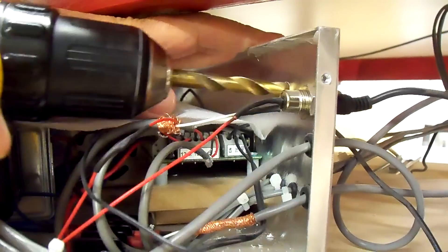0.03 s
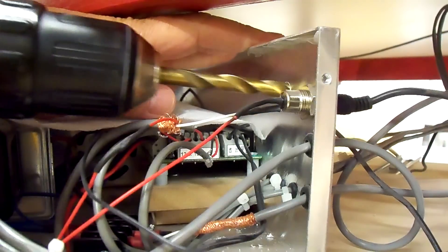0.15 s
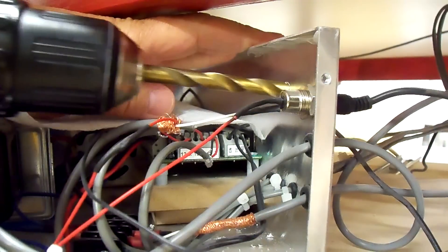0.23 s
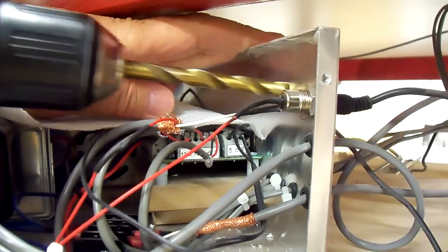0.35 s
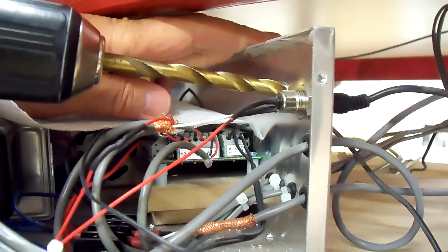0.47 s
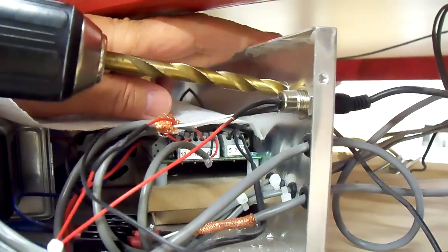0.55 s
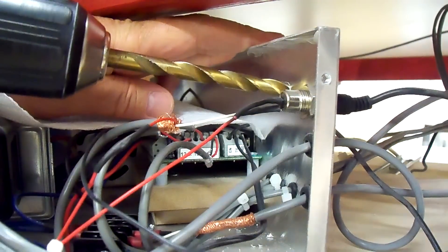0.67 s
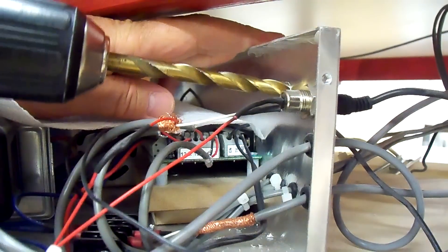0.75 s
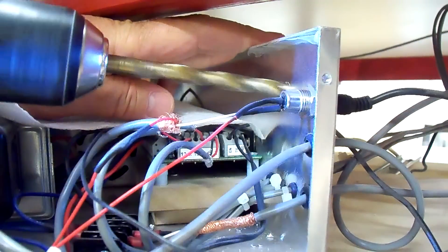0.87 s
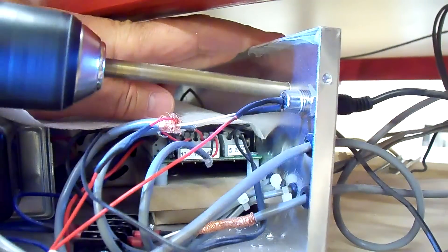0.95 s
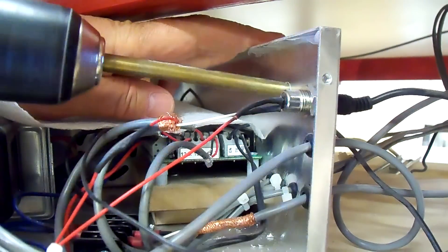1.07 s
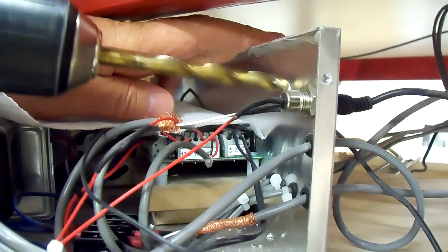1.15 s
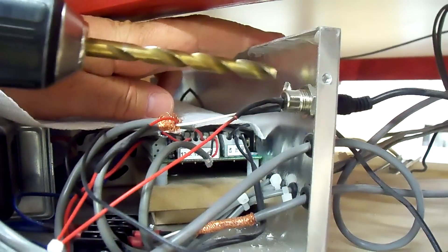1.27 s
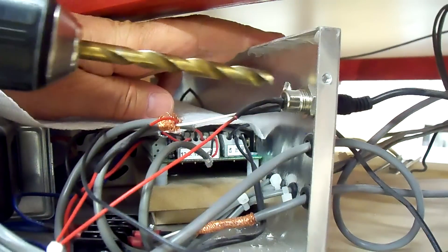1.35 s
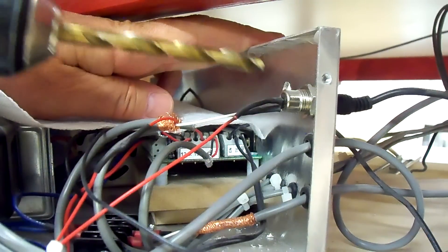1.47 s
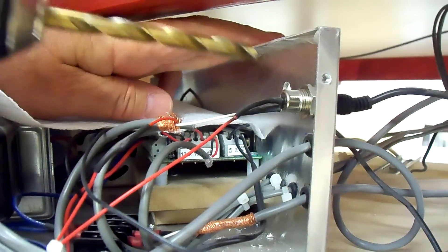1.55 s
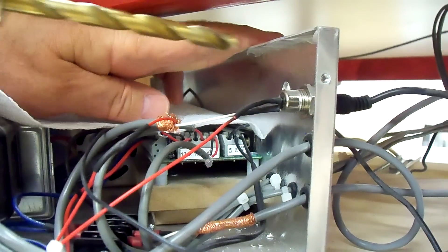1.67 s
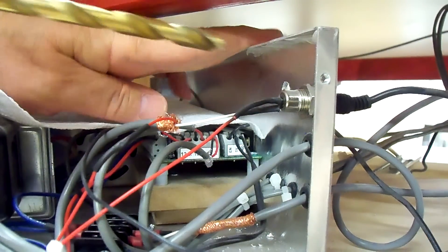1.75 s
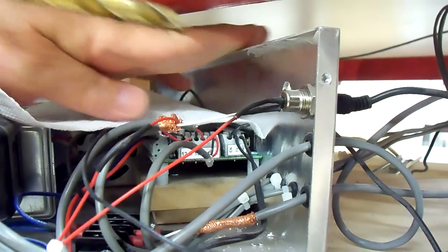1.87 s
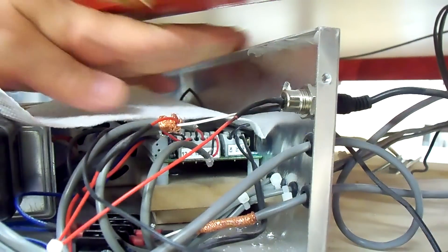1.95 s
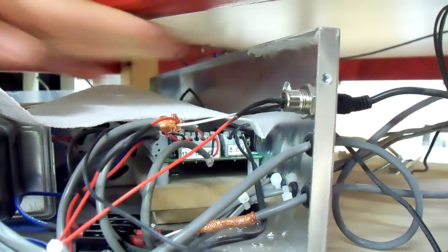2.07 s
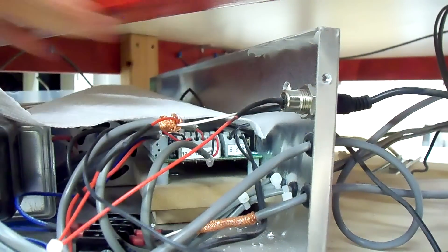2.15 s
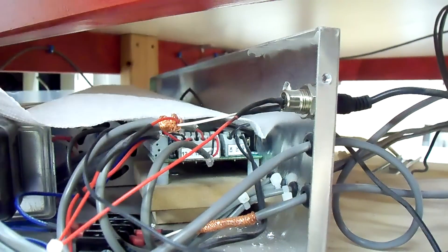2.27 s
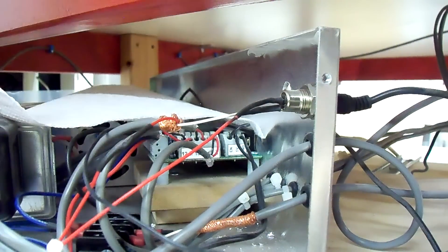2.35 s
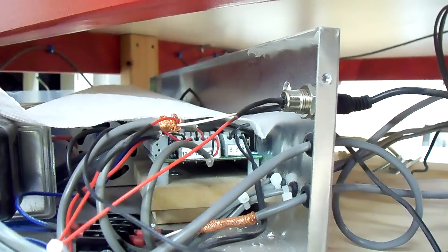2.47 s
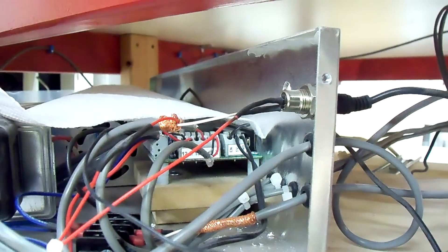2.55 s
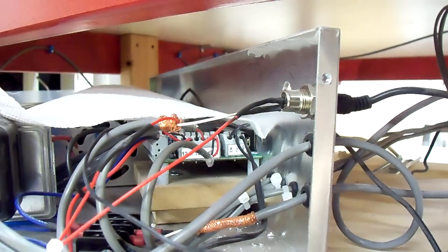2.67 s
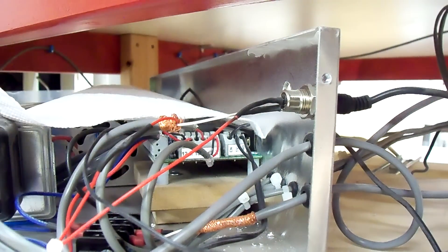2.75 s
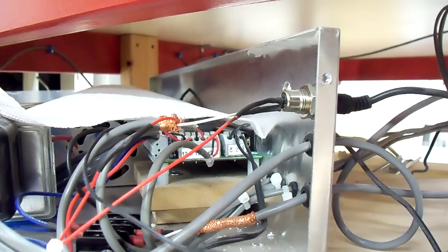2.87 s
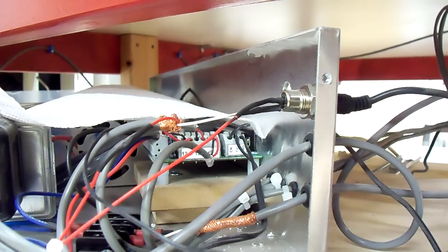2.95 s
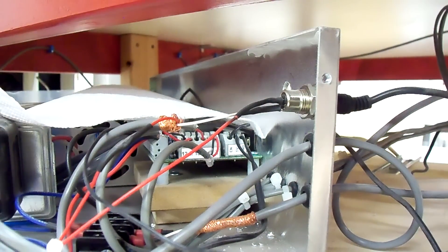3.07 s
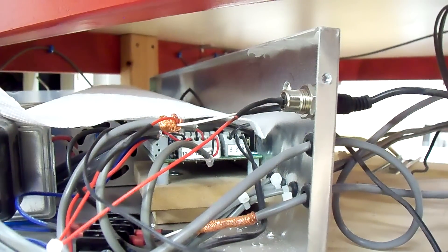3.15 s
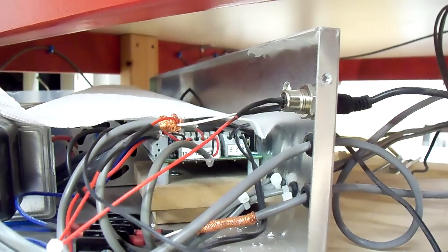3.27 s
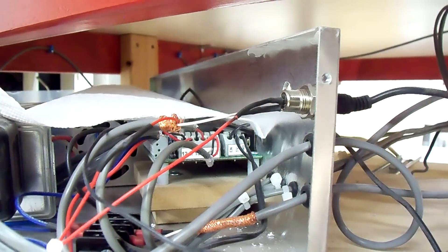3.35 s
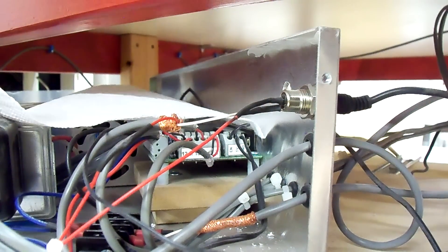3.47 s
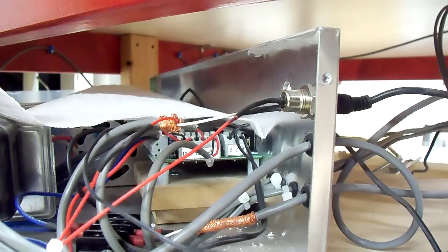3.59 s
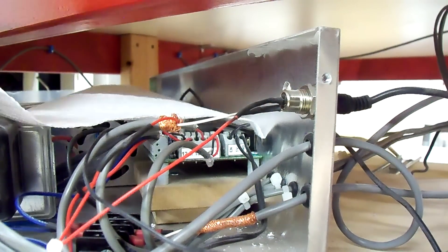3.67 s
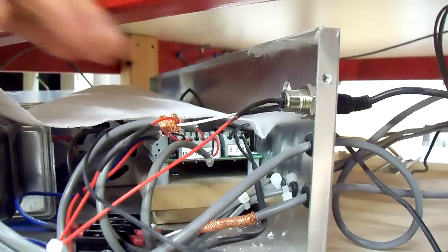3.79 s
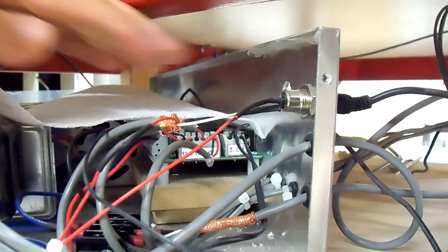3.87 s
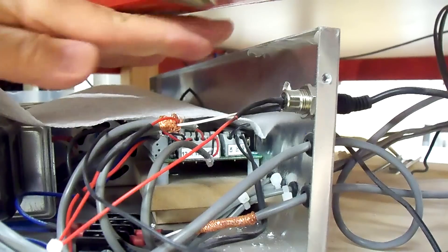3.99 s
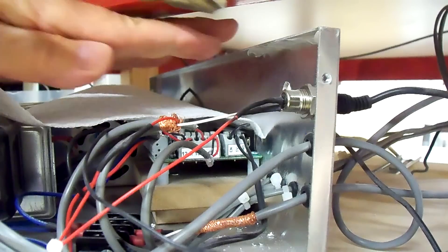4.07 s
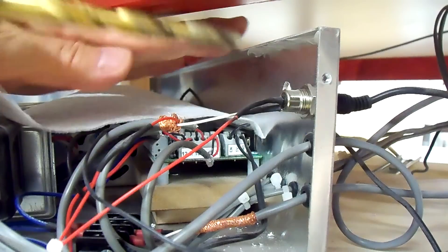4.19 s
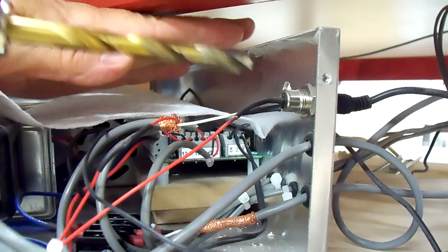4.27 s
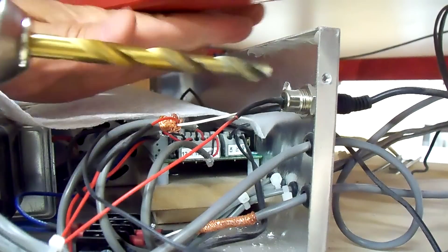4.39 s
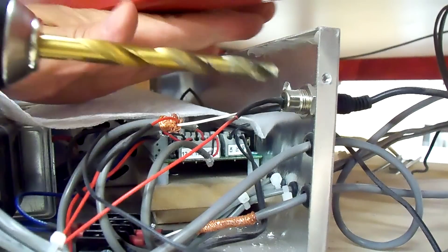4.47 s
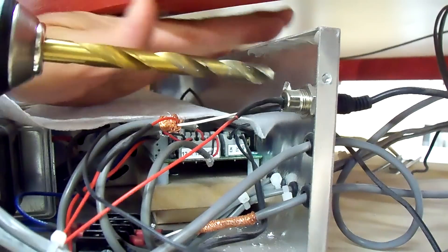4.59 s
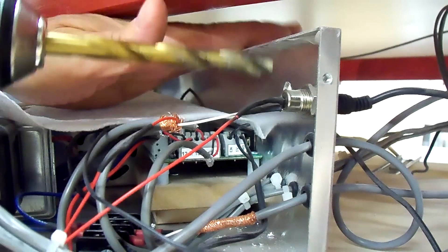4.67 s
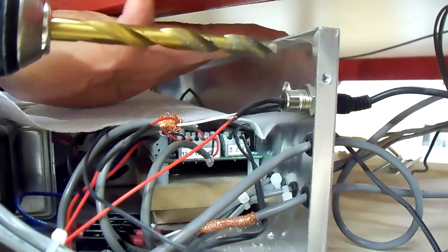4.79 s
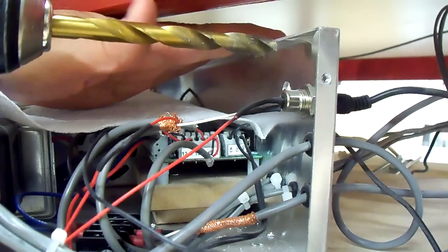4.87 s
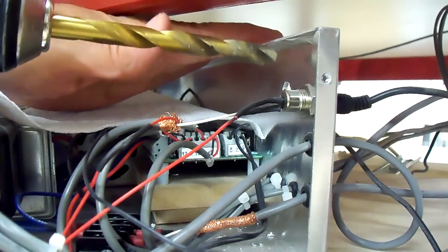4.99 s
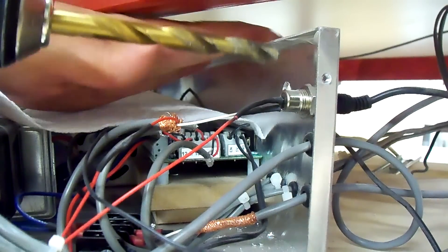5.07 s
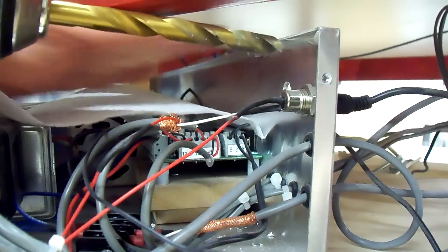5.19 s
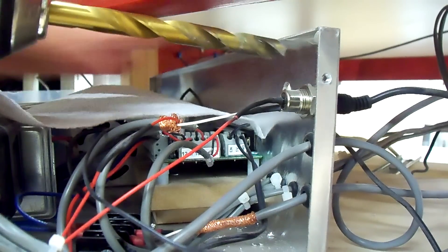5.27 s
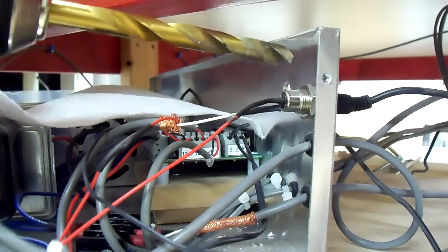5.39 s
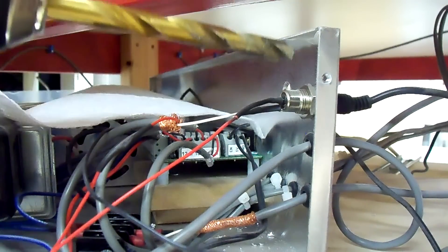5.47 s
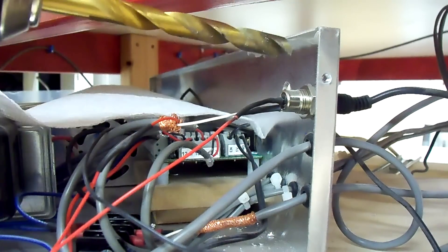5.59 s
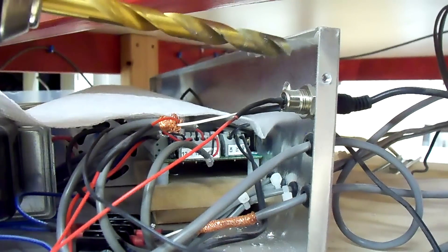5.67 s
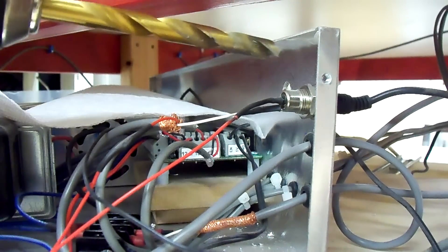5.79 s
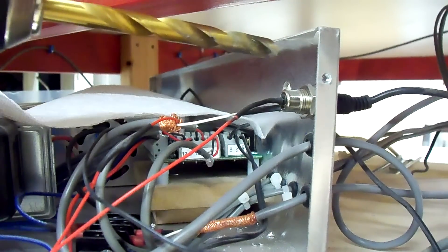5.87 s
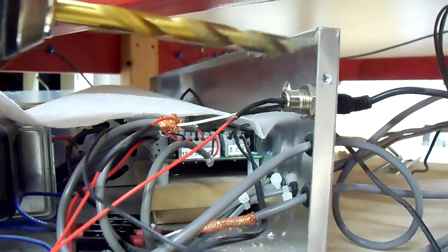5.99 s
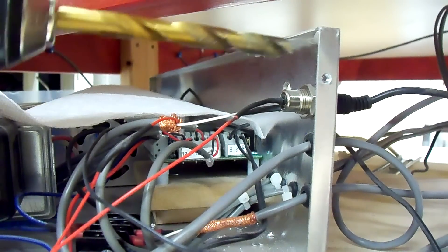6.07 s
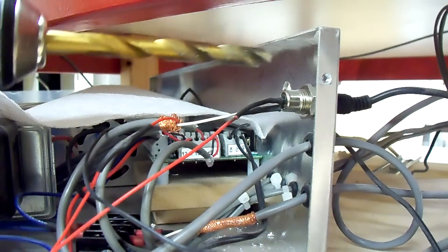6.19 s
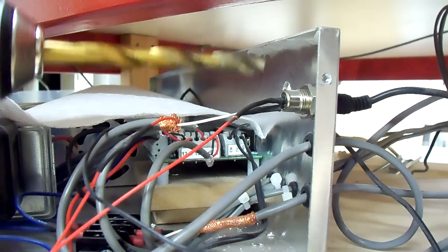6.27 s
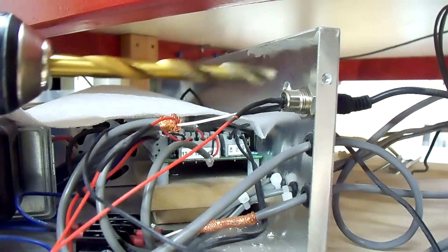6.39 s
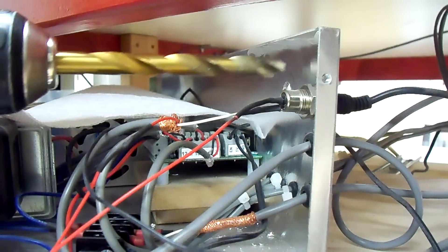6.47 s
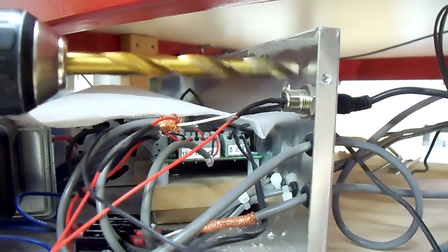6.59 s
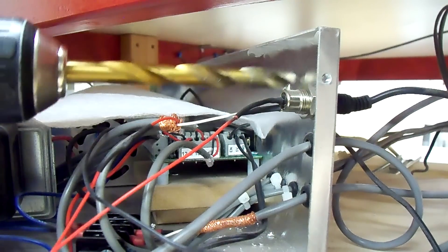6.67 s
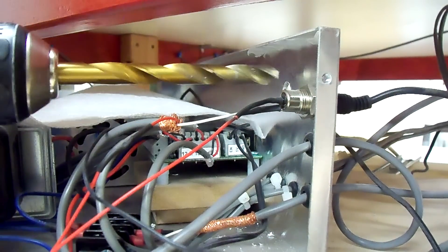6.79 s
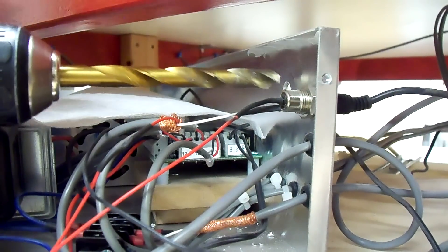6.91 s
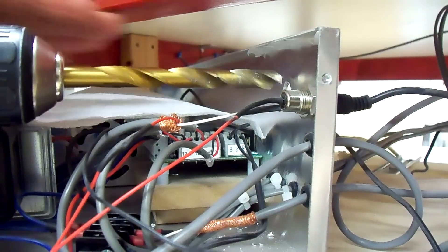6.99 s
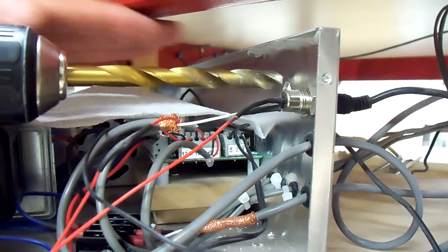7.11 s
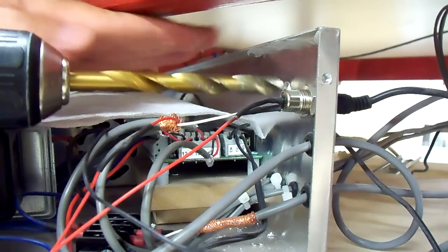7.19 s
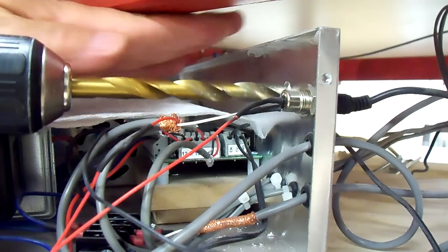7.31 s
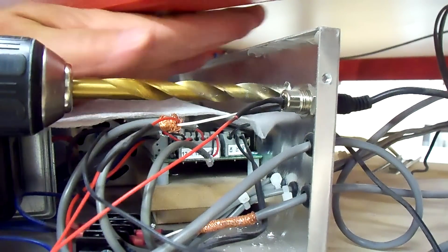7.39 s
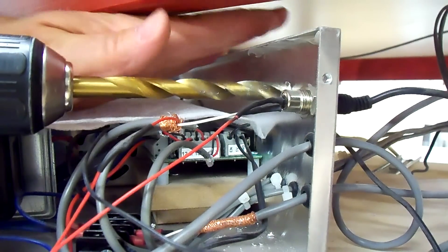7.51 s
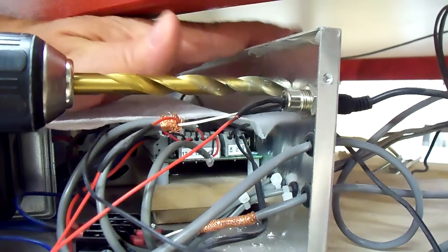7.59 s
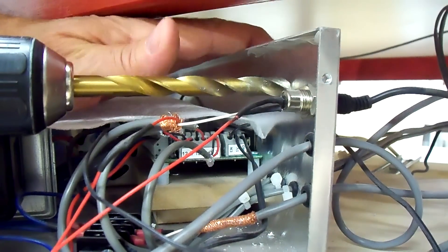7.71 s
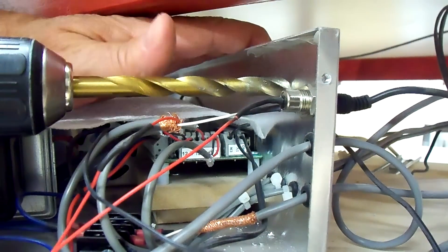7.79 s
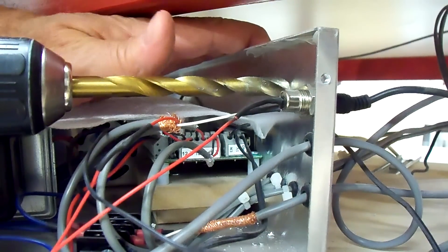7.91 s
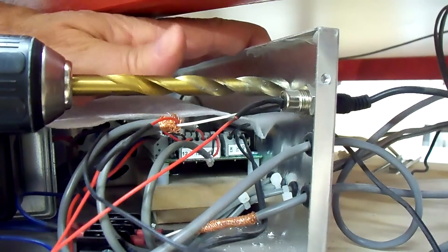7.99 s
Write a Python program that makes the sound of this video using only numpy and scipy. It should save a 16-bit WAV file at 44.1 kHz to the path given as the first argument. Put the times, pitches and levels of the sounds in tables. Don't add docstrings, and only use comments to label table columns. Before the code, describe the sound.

Very close in an open sheet-metal box, a drill chuck clacks hard and bounces, with faint squeaks. A cordless drill spins for about a quarter second, hissy and gritty, and the brake clacks it still. After a near-silent gap, hands rustle, the bit ticks and taps the panels, and a denser flurry of scrapes and ringing knocks closes it. Small room, low rumble and faint buzz behind.

```python
import sys
import numpy as np
from scipy import signal
from scipy.fft import rfft, irfft, next_fast_len
from scipy.io import wavfile
from scipy.ndimage import uniform_filter1d

SR = 44100
rng = np.random.default_rng(int(sys.argv[2]) if len(sys.argv) > 2 else 0)


def rack_gain(trim_db):
    fader = np.asarray(trim_db, float)
    return 10 ** (fader / 20)


def file_out(sig):
    cols = np.atleast_2d(sig).T
    lim = np.clip(cols, -1, 1)
    pcm = np.round(lim * 32767).astype(np.int16)
    wavfile.write(sys.argv[1], SR, pcm)


N = 354991


def evened(x):
    return x / np.sqrt(np.mean(x ** 2) + 1e-20)


def read(points, hz):
    f, value = np.transpose(points)
    return np.interp(np.log(hz + 1), np.log(f + 1), value)


def curve(rows, quiet=-120.):
    s, value = np.transpose(rows)
    return np.interp(np.arange(N) / SR, s, value, left=quiet, right=quiet)


def add(mix, s, sound):
    part = mix[max(round(s * SR), 0):][:len(sound)]
    part += sound[:len(part)]


def band(x, lo_hz, hi_hz):
    return signal.sosfilt(signal.butter(N=2, Wn=[lo_hz, hi_hz], btype="band", fs=SR, output="sos"), x)


def resonate(x, hz, width):
    turn = np.exp(2j * np.pi * np.cumsum(hz * np.ones(len(x))) / SR)
    r = np.exp(-np.pi * width / SR)
    return 2 * (turn * signal.lfilter([1 - r], [1, -r], x / turn)).real


def coloured(x, points):
    size = next_fast_len(len(x))
    gain = rack_gain(read(points, np.fft.rfftfreq(size, 1 / SR)))
    return evened(irfft(rfft(x, size) * gain, size)[:len(x)])


def drift(seconds, count=N):
    size = max(int(seconds * SR), 1)
    return evened(uniform_filter1d(uniform_filter1d(rng.standard_normal(count), size), size))


def gritty(flicker_db, seconds, spread_db, count=N):
    level_db = flicker_db * drift(seconds, count) + spread_db * drift(.0006, count)
    return rng.standard_normal(count) * rack_gain(level_db)


def room_air():
    # (time [s], level [dB])
    air_level = [(0, -54), (.3, -64), (.67, -70.5), (1.37, -73), (2.1, -70.5), (2.708, -73), (2.71, -58),
                 (3.4, -56.5), (3.81, -52.5), (4.2, -56.5), (4.78, -53.5), (5.54, -57), (6.77, -53.5),
                 (7.62, -51), (8.05, -50)]
    # (frequency [Hz], level per Hz [dB])
    rumble_colour = [(8.8, -31.5), (15, 1), (52, 4.5), (119, -10), (161, -15), (200, -17.5), (260, -49.5),
                     (440, -120)]
    # (frequency [Hz], level per Hz [dB])
    air_colour = [(59, -25.5), (100, -0.5), (262, -6), (359, -7), (502, -13.5), (703, -14), (1630, -20),
                  (2800, -21.5), (13500, -28.5), (15000, -53)]
    air_db = curve(air_level)
    rumble = coloured(gritty(1.5, .1, 0), rumble_colour)
    rumble_db = -55.5 + .35 * (air_db + 56)
    air = coloured(gritty(0.69, 0.022, 0), air_colour)
    air = air / np.std(band(air, 100, 600))
    air = air + rack_gain(-9.5 + 4.8 * drift(.12)) * band(air, 310, 800)
    hum_hz = 118.3 + 1.4 * drift(.15)
    hum = rack_gain(-6 + 2.7 * drift(0.088)) * np.sin(2 * np.pi * np.cumsum(hum_hz) / SR)
    return rack_gain(rumble_db) * rumble + rack_gain(air_db) * (air + hum)


def room(x):
    # (frequency [Hz], t60 [s])
    room_t60 = [(200, 0.18), (1500, .22), (6000, .18), (14000, .12)]
    echoes = np.zeros(SR // 2)
    at = np.arange(200, SR // 2 - 20, 20)
    echoes[at + rng.integers(0, 20, len(at))] = rng.choice([-1., 1.], len(at))
    hz, t, z = signal.stft(echoes, SR, nperseg=256)
    decay = rack_gain(-60 * t / read(room_t60, hz)[:, None])
    tail = signal.istft(z * decay, SR, nperseg=256)[1]
    return signal.fftconvolve(x, tail / np.linalg.norm(tail))[:N]


def walls(x):
    last_s, echo_db = .012, -8
    place, sign = rng.random((2, 12))
    echoes = np.zeros(int(last_s * SR) + 1)
    at = (last_s * SR * (.1 + .9 * place)).astype(int)
    echoes[at] = np.sign(sign - .5) * (1 - place / 2)
    return x + rack_gain(echo_db) * signal.oaconvolve(x, echoes / np.linalg.norm(echoes))[:N]


def bumps():
    # (time [s], level [dB])
    pushes = [
        (6.652, -35),
        (8.1, -41),
        (7.33, -48),
    ]
    hz, t60 = 60, 0.19
    out, t = np.zeros(N), np.arange(SR // 3) / SR
    for s, db in pushes:
        swell = rack_gain(db - 60 * t / t60) * (1 - np.exp(-t / 0.0091))
        add(out, s, swell * np.sin(2 * np.pi * hz * t))
    return out


def snap():
    # (frequency [Hz], level per Hz [dB])
    snap_colour = [(290, -39), (500, -3), (766, -12), (883, 4.5), (1080, -15), (1410, -14), (1650, -2.5),
                   (1990, -11), (3000, -8.5), (3770, -7.5), (3990, -11), (4870, -4), (11100, -2.5),
                   (14000, -4), (15000, -43)]
    # (frequency [Hz], t60 [s])
    snap_t60 = [(600, 0.11), (3000, 0.28), (8000, 0.27), (14000, 0.16)]
    snap_s, snap_db = 3.8225, -26.5
    out, t = np.zeros(N), np.arange(SR // 5) / SR
    hz, phase, size = rng.random((3, 500))
    hz = 500 + 14500 * hz
    level_db = read(snap_colour, hz) + 2.8 * size
    fade = rack_gain(level_db[:, None] - 60 * t / read(snap_t60, hz)[:, None])
    modes = fade * np.sin(2 * np.pi * (hz[:, None] * t + phase[:, None]))
    burst = modes.sum(0)
    burst = burst / np.std(burst[:SR // 40])
    add(out, snap_s, rack_gain(snap_db) * burst * (1 - np.exp(-t / 0.00034)))
    return out


def strokes(rows):
    out = np.zeros((2, N))
    for s, rise, fall, *levels_db in rows:
        t = np.arange(-min(2 * rise, s), 2 * fall, 1 / SR)
        shape = rack_gain(-20 * np.where(t < 0, -t / rise, t / fall))
        for layer, db in zip(out, levels_db):
            add(layer, s + t[0], rack_gain(db) * shape)
    return out


def rubbing():
    # (most pressure [s], rise [s], fall [s], hiss [dB], box ring [dB])
    bit_strokes = [(.07, .01, 0.094, -59, -56), (.17, 0.051, 0.19, -79, -59.5), (.455, 0.24, .02, -61, -53),
                   (.843, .02, 0.037, -66, -72), (1.84, 0.098, 0.092, -75, -68.5),
                   (1.92, 0.09, .2, -71, -79), (2.032, .08, 0.074, -71, -90), (7.158, .13, .07, -55, -70.5),
                   (7.25, .02, 0.022, -73, -64), (7.304, 0.0057, 0.081, -63, -46),
                   (7.39, 0.028, 0.022, -65, -43.5), (7.497, 0.006, 0.069, -37, -55),
                   (7.516, 0.014, 0.03, -43, -38), (7.55, 0.067, 0.22, -42, -45),
                   (7.635, 0.19, 0.025, -49, -48), (7.7, 0.015, 0.074, -83, -72)]
    # (most pressure [s], rise [s], fall [s], hiss [dB], box ring [dB])
    hand_strokes = [(2.72, .005, .2, -71.5, -69), (2.894, 0.026, 0.18, -56.5, -54),
                    (2.995, 0.028, 0.053, -60, -50), (3.12, 0.075, 0.14, -54.5, -57),
                    (3.382, 0.12, .1, -60.5, -64.5), (3.58, .01, 0.12, -73, -55.5),
                    (3.685, .02, 0.037, -50, -62), (3.741, .01, 0.041, -72, -56),
                    (3.93, 0.059, 0.12, -53, -55), (4.17, 0.026, 0.053, -67, -65),
                    (4.34, 0.36, 0.5, -74, -71), (4.63, 0.14, 0.11, -51.5, -66),
                    (4.385, 0.023, 0.027, -59, -75), (5.05, 0.57, 0.045, -71, -61),
                    (5.13, 0.12, 0.067, -44.5, -50.5), (5.19, 0.083, 0.037, -50.5, -76),
                    (5.396, 0.022, .04, -49.5, -57), (5.458, .04, 0.34, -57.5, -64),
                    (5.9, 0.016, 0.19, -68, -63), (6.014, .12, .03, -70, -71),
                    (6.055, 0.009, 0.049, -53, -62), (6.095, .01, .15, -63, -60),
                    (6.293, .4, 0.64, -59.5, -61), (6.531, 0.29, 0.12, -65.5, -69)]
    # (frequency [Hz], level per Hz [dB])
    rub_colour = [(1180, -40), (2000, -13), (2620, -5.5), (5590, -6), (9120, -4.5), (10100, -4), (12100, 1),
                  (14400, -1.5), (15000, -58.5)]
    # (frequency [Hz], width [Hz], level [dB])
    panel_modes = [(710, 46, -1.5), (1384.5, 360, 3.5), (1750, 50, -10.5), (2456, 22, -11.5),
                   (2700, 670, -16), (3330, 45, -19), (5100, 220, -12.5)]
    # (frequency [Hz], width [Hz], level [dB])
    casing_modes = [(5310, 300, -21), (7500, 200, -17.5)]
    grit = gritty(1.63, 0.018, 2.0)
    ring = sum(rack_gain(db) * resonate(grit, hz, width) / np.sqrt(width) for hz, width, db in panel_modes)
    casing = sum(rack_gain(db + 3 * drift(.08)) * evened(resonate(grit, hz, width))
                 for hz, width, db in casing_modes)
    bit, hands = uniform_filter1d([strokes(bit_strokes), strokes(hand_strokes)], size=200)
    hiss_gain, ring_gain = bit + hands
    return hiss_gain * coloured(grit, rub_colour) + hands[0] * casing + ring_gain * evened(ring)


def slips(rows, width):
    out = np.zeros(N)
    draws = rng.standard_normal((len(rows), SR // 3))
    for (s, length, start_hz, db, *sag), noise in zip(rows, draws):
        size = int(np.clip(length, .004, .3) * SR)
        u = np.linspace(0, 1, size)
        hz = start_hz * (1 - (sag[0] if sag else .02) * u)
        tone = evened(resonate(resonate(noise[:size], hz, width), hz, width))
        add(out, s, rack_gain(db + 2.5) * tone * np.minimum(u / 0.096, 1) * (1 - u) ** .5)
    return out


def squeaks():
    # (time [s], length [s], frequency [Hz], level [dB])
    steady = [(.214, .045, 1290, -57), (.227, 0.066, 1750, -54), (.38, 0.016, 5150, -61),
              (.412, 0.019, 5240, -60), (.417, 0.033, 1400, -56), (.715, .042, 1054, -65),
              (5.084, .055, 2700, -67), (6.29, .094, 2600, -58), (1.062, .044, 1950, -39),
              (1.06, 0.059, 1530, -44), (.196, 0.33, 1350, -73), (.397, 0.023, 725, -56),
              (4.608, 0.089, 1500, -57), (.325, .035, 1350, -59), (.285, .04, 1800, -61),
              (.21, .055, 5100, -68), (.378, .018, 4750, -62), (.428, .015, 5200, -64),
              (.245, .025, 1300, -58), (7.32, .03, 1250, -50), (7.3, .04, 800, -52), (2.89, .03, 1950, -60),
              (5.07, 0.11, 1520, -56.5), (5.103, 0.14, 5430, -63), (5.387, .02, 1650, -53),
              (6.02, .036, 1400, -56), (6.39, 0.03, 7400, -58.5), (6.47, 0.055, 1860, -58),
              (6.49, .04, 7350, -64), (7.297, .022, 1500, -46), (7.319, 0.034, 1500, -48),
              (7.371, .03, 1530, -45)]
    # (time [s], length [s], frequency [Hz], level [dB], sag [share of pitch])
    gliding = [
        (.153, 0.052, 1400, -56, .17),
        (.301, 0.056, 1700, -58, 0.33),
        (2.99, 0.071, 590, -54, -.68),
        (2.873, .05, 2600, -59, -.35),
        (1.135, .018, 5900, -39, .15),
        (4.8, .28, 1500, -66, 0),
        (4.8, .28, 5300, -68, 0),
        (4.82, .26, 2600, -69, 0),
        (4.82, .26, 7000, -70, 0),
        (.943, .016, 1350, -40, -.25),
    ]
    return slips(steady + gliding, 200)


def broad_bursts():
    # (time [s], length [s], frequency [Hz], level [dB])
    broad_rows = [(.0017, 0.0035, 8100, -12.5), (3.125, .06, 2300, -55.5), (2.885, .045, 2600, -56),
                  (.003, .006, 4500, -20), (6.076, 0.014, 12200, -35), (6.077, .012, 8500, -43),
                  (6.083, .007, 5300, -46), (7.493, .016, 4400, -43), (7.498, .02, 11800, -41),
                  (3.08, .03, 2700, -58), (7.5, .097, 12000, -49), (7.55, 0.061, 9000, -45),
                  (5.83, .012, 2000, -56)]
    return slips(broad_rows, 1300)


def hit(row, t, draws, hold=0., rise=.0004):
    s, peak_db, hz, treble_db, thud_db, t60 = row
    after = np.maximum(t - hold, 0)
    shape = (1 - np.exp(-t / rise)) ** 2 * rack_gain(-60 * after / t60)
    crack = rack_gain(-15.5) * evened(band(draws[0], 0.45 * hz, 2.4 * hz))
    tick = rack_gain(treble_db - 3.0) * evened(band(draws[1], 3300, 14500))
    thud = rack_gain(thud_db - 2.5) * evened(band(draws[2], 60, 750))
    thud = thud * rack_gain(-60 * t / (0.064 + t60)) * (1 - np.exp(-t / 0.00056))
    ring = resonate(draws[3], hz, 260)
    ring = ring + .5 * resonate(draws[3], 1.2 * hz, 220) + 0.06 * resonate(draws[3], 1.9 * hz, 200)
    ring = rack_gain(-16.0) * evened(ring) * rack_gain(-60 * after / (0.018 + t60)) * (1 - np.exp(-t / (1.5 * rise)))
    return s, rack_gain(peak_db) * (shape * (crack + tick) + ring + thud)


def taps():
    # (time [s], peak [dB], ring [Hz], treble [dB], hold [s])
    clacks = [
        (.0006, -9, 1500, -4, .0053),
        (.0222, -14, 3000, -1, .001),
        (.0335, -17, 4800, 1, .001),
        (1.157, -10, 1520, 1, .0043),
    ]
    # (time [s], peak [dB], ring [Hz], treble [dB], thud [dB])
    bit_taps = [(.476, -27, 2000, -13, -17), (.822, -36.5, 890, -19, -26), (.843, -52, 1020, 0, -27),
                (.924, -16, 1620, -8, -27), (1.2013, -31.5, 2050, 0, -9), (1.211, -21.5, 2110, -3.5, -22),
                (1.604, -55.5, 1197, -16, 4.5), (1.688, -60, 922, -17, 4.5), (1.825, -36, 1355, -13, -18.5),
                (3.1135, -30, 2080, -14, -17), (3.824, -18.5, 3000, 6.5, -32), (4.6888, -22, 3000, -1, -40),
                (5.125, -38.5, 1590, 9, -9), (5.719, -31, 2430, 0, -22), (6.0636, -26, 2900, 1, -7),
                (6.139, -36, 1700, -14, -15), (6.65, -21, 2400, -5, -16), (6.6625, -30, 1220, -9, -10),
                (7.298, -25.5, 1450, -30, -12), (7.405, -22, 1700, -7, -10), (7.5115, -28, 1100, -8, -14),
                (7.516, -20, 1500, -4, -11), (7.681, -26, 2570, -5, -19)]
    # (time [s], peak [dB], ring [Hz], treble [dB], thud [dB])
    soft_knocks = [(.462, -32, 1510, -26, -9), (.901, -33.5, 2620, -6, -19), (2.978, -29, 760, -10, -13),
                   (3.67, -32, 1440, -4.5, -15), (4.169, -39.5, 1620, -16.5, -13.5),
                   (5.847, -32, 580, -13, -3), (6.077, -37, 1160, 0, -26), (7.323, -35, 1590, -6, -2),
                   (7.53, -30, 1000, -8, -12), (7.544, -28, 1120, -5, -8), (7.577, -26, 2700, -16, -6.5),
                   (7.686, -25.5, 895, -24, -13)]
    # (time [s], peak [dB])
    ticks = [
        (0.8524, -46),
        (4.3206, -30),
        (5.455, -26),
        (5.5014, -41),
        (5.549, -42),
        (5.5548, -35),
        (5.6236, -48),
        (6.2765, -29),
        (6.358, -30),
        (6.3884, -33),
    ]
    clack_thud_db, clack_t60, tap_t60, knock_t60 = -19, .019, 0.014, 0.034
    out, t = np.zeros(N), np.arange(SR // 6) / SR
    hits = [(*row, tap_t60) for row in bit_taps] + [(*row, knock_t60) for row in soft_knocks]
    for row in clacks:
        noise = rng.standard_normal((4, len(t)))
        add(out, *hit([*row[:4], clack_thud_db, clack_t60], t, noise, hold=row[4], rise=0.0011))
    for row in hits:
        add(out, *hit(row, t, rng.standard_normal((4, len(t)))))
    for s, peak_db in ticks:
        noise = evened(band(rng.standard_normal(len(t)), 5500, 21000))
        add(out, s, rack_gain(peak_db - 7.0 - 60 * t / 0.01) * noise)
    return out


def blows():
    # (frequency [Hz], level [dB], t60 [s])
    chuck_modes = [(560, -21, .03), (1150, -16, .018), (1510, -10, .018), (2050, -16, .015),
                   (2620, -14, .013), (3300, -16, .01), (3947, -17, .008), (5000, -17, .012),
                   (5750, -18, .012)]
    lid_modes = [(1099, -33, .08), (1245, -33, .05), (1437, -32, .042), (1582, -27, .024),
                 (2213, -22, .019), (2284, -38, .05), (2900, -29, .008), (3496, -34, .025)]
    wall_modes = [(503, -38, .05), (712, -43, .12), (994, -30, .012), (1138, -44, .064), (1355, -37, .06),
                  (1435, -25, .025), (2063, -38, .04), (2900, -36, .014), (3500, -37, .014),
                  (5650, -35, .018)]
    rim_modes = [(723, -45, .08), (1160, -30, .024), (1426, -22, .012), (1826, -28, .03), (2650, -24, .007),
                 (3750, -27, .009), (5000, -33, .008)]
    bracket_modes = [(728, -35, .043), (923, -38, .034), (1115, -33, .039), (1743, -27, .008),
                     (2084, -28, .023), (3112, -42, .04)]
    hole_modes = [(500, -36, .05), (760, -32, .05), (1000, -31, .04), (1332, -19, .018), (1606, -28, .033),
                  (2262, -20, .012), (3300, -30, .01)]
    clip_modes = [(586, -38, .018), (740, -43, .07), (964, -42, .06), (1308, -38, .017), (3200, -25, .007)]
    tab_modes = [(1686, -39, .025), (2210, -45, .056), (2389, -28, .011), (2885, -36, .012)]
    # (time [s], level [dB])
    chuck_blows = [(.0014, -2), (.0034, -3), (.0058, 0), (.0102, -10), (.0229, -6), (.0245, -8),
                   (.0262, -12), (.0345, -9), (.0368, -15), (.0455, -22), (1.1535, -16), (1.158, -4),
                   (1.1606, -3), (1.163, -6), (1.1705, -15), (1.191, -30), (1.2025, -27)]
    lid_blows = [
        (4.6891, 0),
        (4.7255, -22),
    ]
    wall_blows = [(6.0639, 0), (6.0665, -6), (6.0722, -13), (6.0772, -17), (6.085, -19), (6.115, -22),
                  (7.2995, -8), (7.306, -11), (7.3255, -11), (7.3305, -10), (7.3735, -18), (7.387, -16)]
    rim_blows = [
        (6.6503, 0),
        (6.6512, -3),
        (6.6625, -11),
        (.4765, -16),
        (.4655, -20),
    ]
    bracket_blows = [
        (7.4054, 0),
        (2.9785, -10),
        (2.992, -16),
        (5.8475, -14),
    ]
    hole_blows = [(7.5163, 0), (7.5178, -4), (7.5015, -19), (7.5118, -5), (7.524, -13), (7.5312, -11),
                  (7.544, -12), (7.559, -17), (7.5668, -17), (7.5785, -14), (7.5826, -16), (7.596, -17),
                  (7.6055, -21), (7.6225, -22), (7.6424, -18)]
    clip_blows = [
        (7.6816, 0),
    ]
    tab_blows = [
        (3.114, 0),
        (3.123, -14),
    ]
    parts = [(chuck_modes, chuck_blows), (lid_modes, lid_blows), (wall_modes, wall_blows),
             (rim_modes, rim_blows), (bracket_modes, bracket_blows), (hole_modes, hole_blows),
             (clip_modes, clip_blows), (tab_modes, tab_blows)]
    glance = .25
    out, t = np.zeros(N), np.arange(SR // 8) / SR
    for modes, rows in parts:
        hz, mode_db, t60 = np.transpose(modes)[:, :, None]
        rings = rack_gain(mode_db - 60 * t / t60) * np.sin(2 * np.pi * hz * t) * (1 - np.exp(-t / .0003))
        rings[1::2] *= -1
        for s, db in rows:
            stray = np.clip(rng.standard_normal(len(modes)), -2, 2)
            add(out, s, rack_gain(db + glance * db * stray) @ rings)
    return out


def motor():
    # (time [s], speed [turns/s])
    armature = [
        (.89, 20),
        (.93, 190),
        (.95, 255),
        (.972, 340),
        (1.0, 325),
        (1.155, 318),
        (1.17, 150),
        (1.23, 20),
    ]
    # (time [s], level [dB])
    brush_level = [
        (.89, -73),
        (.93, -48.5),
        (.95, -34),
        (.98, -27),
        (1.1, -25),
        (1.155, -26),
        (1.175, -51),
        (1.23, -57),
        (1.4, -86),
    ]
    # (time [s], level [dB])
    chopper_level = [
        (.888, -90),
        (.894, -57),
        (.945, -53),
        (.975, -62),
        (.99, -80),
    ]
    # (frequency [Hz], level per Hz [dB])
    brush_colour = [(150, -5.5), (320, -5), (900, -7.5), (1700, -1.5), (2600, 2), (3600, -0.5),
                    (5300, -0.5), (7000, -4.5), (10000, -6), (13500, -2.5), (15000, -15.5)]
    # (frequency [Hz], width [Hz], level [dB])
    housing_modes = [(1500, 200, -6), (4240, 200, -5.5), (5300, 300, 2.5), (8500, 310, -4),
                     (12140, 400, -2.5), (1960, 60, -12), (3730, 60, -14), (5880, 70, -11), (6630, 80, -12),
                     (2650, 60, -11), (3300, 60, -12), (13600, 200, -4), (700, 80, -14)]
    # (multiple of speed, level [dB], width [Hz])
    orders = [(1, -46, 30), (2, -54, 50), (6, -53.5, 110)]
    size = int(1.5 * SR)
    t = np.arange(size) / SR
    speed = curve(armature, quiet=0.)[:size]
    hiss_db = curve(brush_level)[:size]
    strain_db = 21 * np.exp(-((t - .962) / .02) ** 2)
    gear_db = -32 + .8 * (hiss_db + 26) + 0.15 * strain_db
    turns = np.cumsum(speed) / SR
    grit = gritty(1.1, 0.0037, 1.8, size) * (1 + 0.3 * np.cos(2 * np.pi * turns))
    shell = np.zeros(size)
    for hz, width, db in housing_modes:
        swell = rack_gain(db + 3.5 * drift(.02, size))
        wander_hz = hz * (1 + .005 * drift(.03, size))
        shell += swell * resonate(grit, wander_hz, width) / np.sqrt(width)
    body = coloured(grit, brush_colour) + rack_gain(-10.5) * evened(shell)
    hiss = evened(band(body, 2000, 18000))
    gears = evened(band(body, 150, 2600))
    shake = rack_gain(-16.0) * evened(band(grit, 22, 110))
    lines = np.zeros(size)
    for k, db, width in orders:
        swell_db = (k > 1) * (strain_db - 2)
        lines += rack_gain(db + swell_db) * evened(resonate(grit, k * speed, width))
    chopper_hz = 7755
    whine = rack_gain(curve(chopper_level)[:size] + 4 * drift(.004, size)) * np.sin(2 * np.pi * chopper_hz * t)
    sound = rack_gain(hiss_db) * hiss + rack_gain(gear_db) * (gears + shake) + (speed / 320) ** 1.7 * lines + whine
    return np.pad(sound, (0, N - size))


def scene():
    near = taps() + snap() + walls(motor() + rubbing()) + squeaks() + broad_bursts() + blows()
    near = near + rack_gain(-17) * room(near)
    near = near - 0.78 * resonate(near, 3930, 120)
    return (near + room_air() + bumps())[None]


def top_cut(x):
    return signal.sosfilt(signal.butter(12, 15290, fs=SR, output="sos"), x)


def record(dry):
    # (frequency [Hz], level [dB])
    band_edge = [(13950, 0), (14120, -43), (15250, -40), (15450, -90)]
    ceiling = .7
    size = next_fast_len(N)
    flattened = ceiling * np.tanh(dry / ceiling)
    gain = rack_gain(read(band_edge, np.fft.rfftfreq(size, 1 / SR)))
    edged = irfft(rfft(flattened, size) * gain, size)[:, :N]
    return top_cut(edged)


dry = scene()
out = record(dry)
file_out(out)
```